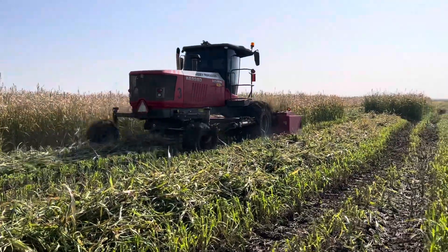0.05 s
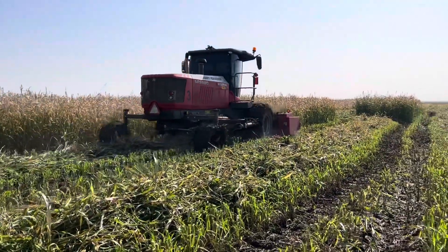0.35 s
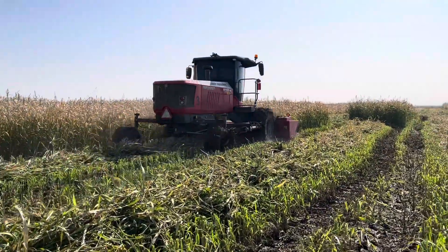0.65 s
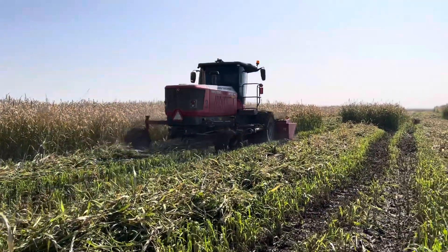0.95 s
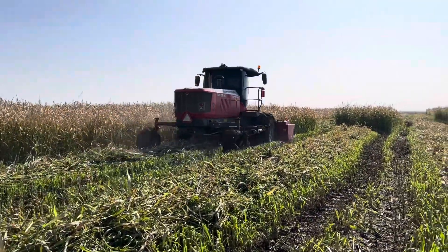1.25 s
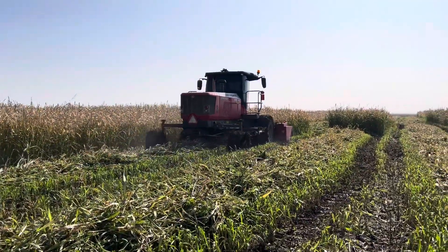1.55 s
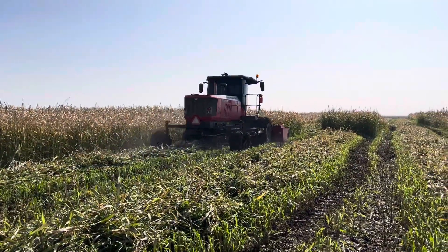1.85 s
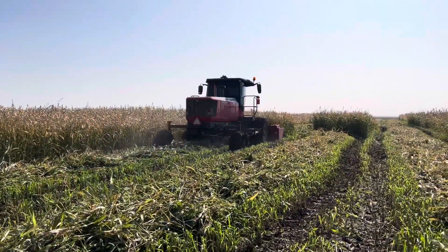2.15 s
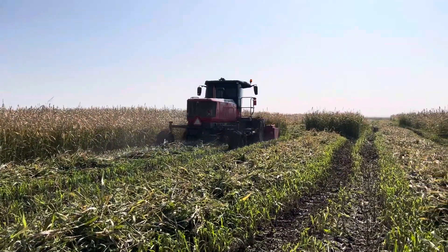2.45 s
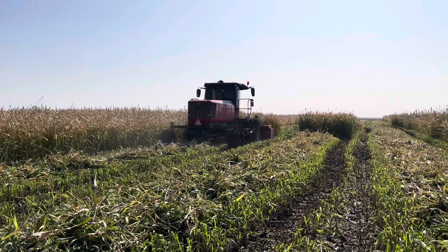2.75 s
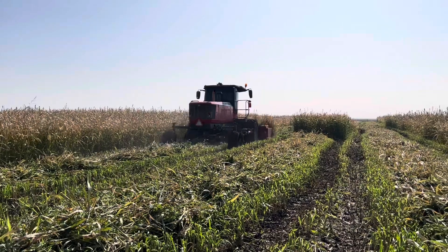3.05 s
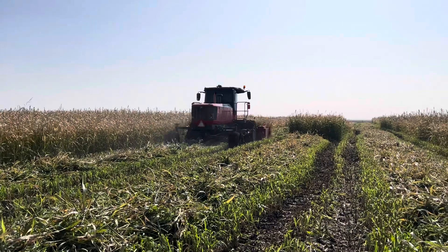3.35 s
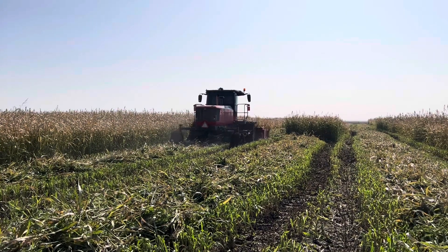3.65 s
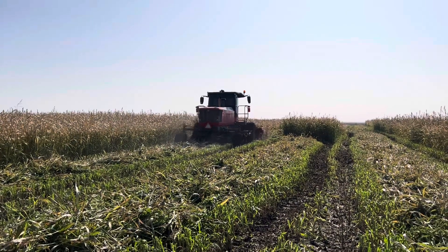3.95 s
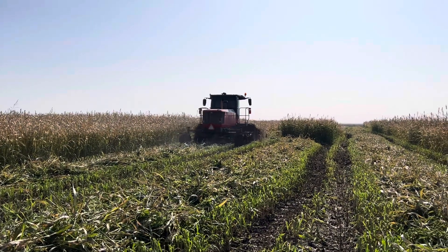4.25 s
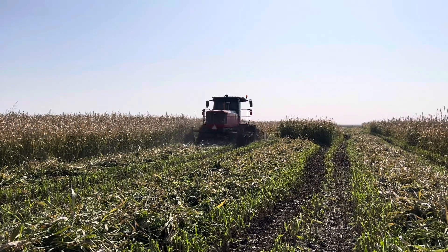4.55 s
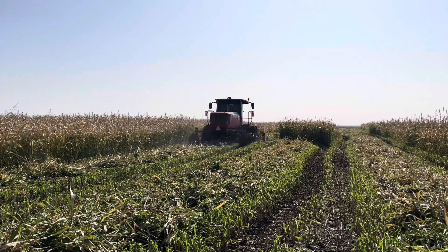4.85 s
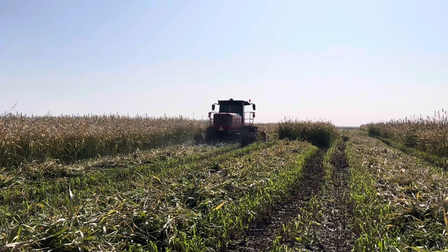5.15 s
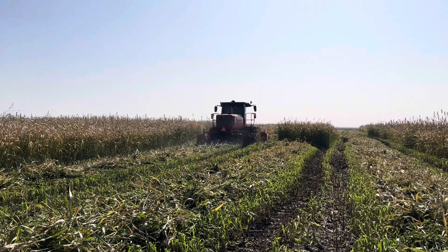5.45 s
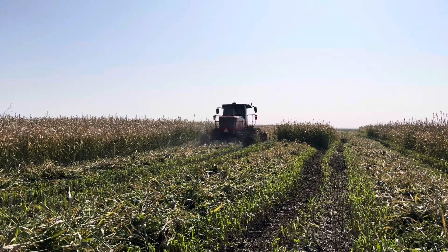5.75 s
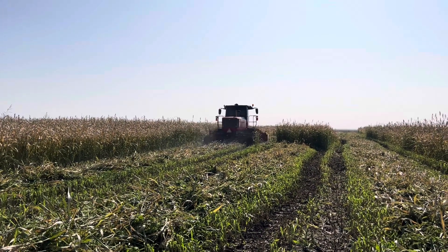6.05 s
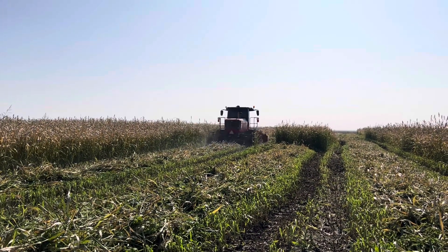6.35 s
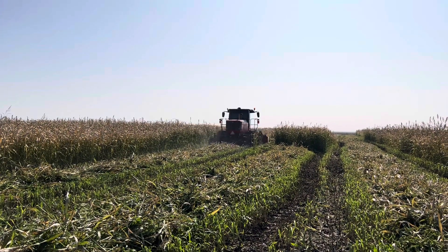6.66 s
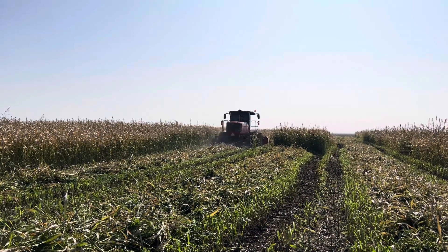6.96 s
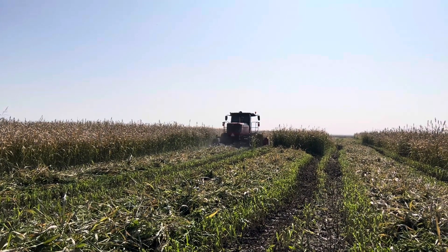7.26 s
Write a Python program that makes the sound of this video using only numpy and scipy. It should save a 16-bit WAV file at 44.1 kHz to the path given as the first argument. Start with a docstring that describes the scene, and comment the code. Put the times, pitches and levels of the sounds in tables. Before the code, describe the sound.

A self-propelled farm mower drives away through a standing crop in an open field, heard from behind. Its spinning discs make a strong low drone over a throbbing diesel engine and a broad rumble. A fuzzy, high gear whine swells and dips as stalks rasp and sizzle through the blades, and loose metal panels rattle lightly. The sound slowly recedes, the hiss fading most while the drone carries on.

```python
"""The drone and gear whine of a self-propelled windrower, driving away through a standing crop.
Its spinning two-knife discs push the air; the diesel throbs and a hydraulic pump sings.
The discs sag and recover with the load, the engine less so, while cut stalks rasp and sizzle through
the header and loose panels rattle over a broad rumble and roar. Heard from the open field behind,
the machine turns its tail to the listener about three seconds in."""
import sys
import numpy as np
from scipy import signal
from scipy.fft import rfft, irfft, next_fast_len
from scipy.io import wavfile
from scipy.ndimage import uniform_filter1d, map_coordinates

SR = 44100
rng = np.random.default_rng(int(sys.argv[2]) if len(sys.argv) > 2 else 0)


def master(y):
    """Save y as 16-bit WAV."""
    cut = np.clip(np.atleast_2d(y).T, -1, 1)
    pcm = np.round(cut * 32767)  # scale
    wavfile.write(sys.argv[1], SR, pcm.astype(np.int16))


N = 330750
TIME = np.arange(N) / SR


def discs(knife_passes, header_db):
    """Each knife pushes the air once a pass and makes the drone; unequal discs add weaker shaft orders."""
    # Fader moves for drone harmonics 1 to 4, the second being the main tone.
    # Each row: time in seconds, level in dB.
    first = [(0.0, -38), (1.1, -33.5), (3.6, -35.5), (5.25, -44), (5.6, -32.5), (5.95, -42), (6.2, -54),
             (7.15, -36.5), (7.5, -44)]
    second = [(0.0, -25), (0.45, -28), (0.8, -25.5), (1.72, -24), (2.05, -28), (2.55, -25), (2.8, -28),
              (3.15, -27), (3.7, -32.5), (3.95, -28.5), (4.25, -29), (4.55, -28.5), (5.1, -27.5),
              (5.4, -34.5), (5.66, -28.5), (5.82, -35), (5.96, -26.5), (6.65, -28), (6.85, -32.5),
              (7.25, -29.5), (7.5, -29)]
    third = [(0.0, -27.5), (1.4, -30.5), (3.1, -39.5), (3.85, -36.5), (4.1, -46.5), (4.45, -37),
             (5.8, -43.5), (6.05, -39), (6.55, -35), (7.5, -34)]
    fourth = [(0.0, -44), (0.8, -52), (1.7, -61.5), (2.8, -77), (4.0, -53.5), (5.0, -50.5), (6.2, -46),
              (6.6, -50), (7.5, -41.5)]
    # Tones of the disc shaft. Each row: multiple of its speed, level in dB against the header noise.
    shaft_orders = [(1, -30), (3, -7), (10, -10.5), (12, -10), (14, -9), (16, -13), (26, -12), (48, -20)]
    drone = sum(tone(k * knife_passes, curve(fader), waver_db=0.7, drift=0.07)
                for k, fader in enumerate([first, second, third, fourth], 1))
    shaft_tones = sum(tone(k * knife_passes / 2, header_db + db, waver_db=2, drift=0.89)
                      for k, db in shaft_orders)
    return drone + shaft_tones


def gears(knife_passes, knife_hz, wad_db, housing_hz=2610, width_hz=380, backlash_rad=1.8):
    """Loose gears mesh out of step: a fuzzy whine that rings their housing and throbs once a disc turn."""
    shaft_turns = knife_passes / 2
    mesh = 60 * shaft_turns  # 60 teeth
    fuzz = lambda cycles, rate: unit(np.cos(2 * np.pi * cycles + backlash_rad * wobble(rate)))
    housing = lambda hz: 1j * hz * width_hz / (housing_hz ** 2 - hz ** 2 + 1j * hz * width_hz)
    # the teeth bite hardest once a turn, and the crop loads them unevenly
    throb = amp(4 * np.cos(2 * np.pi * shaft_turns) + 2.1 * wobble(55))
    teeth = tone(mesh, -2.5, waver_db=1.5, drift=0.45) + fuzz(mesh, 200)
    whine_db = receding_db(-38.5, falloff=1.2, turn_db=-0.5) + 0.6 * sag_hz(knife_hz) + wad_db
    whine = amp(whine_db) * unit(filtered(throb * teeth, housing))
    octave_db = receding_db(-58.3, falloff=1, turn_db=0.7) + 2.5 * sag_hz(knife_hz)
    moving_air_db = 1.8 * wobble(8)
    octave = amp(octave_db + moving_air_db) * unit(throb * fuzz(2 * mesh, 150))
    return whine + octave


def stem_strikes(half_length_s=0.005):
    """Now and then a thick stem jolts the gears, and their housing chirps."""
    # The jolts. Each row: centre in seconds, level at the crest in dB, pitch in Hz.
    jolts = [(0.032, -35, 2580), (0.078, -29, 2620), (0.168, -36, 2700), (0.26, -39, 2570),
             (0.354, -32, 2600), (0.648, -29, 2600), (0.716, -29, 2590), (0.783, -33, 2620),
             (0.926, -33.5, 2690), (1.177, -33.5, 2610), (1.316, -35, 2630), (1.454, -33, 2600),
             (1.678, -32, 2630), (2.135, -35, 2550), (2.295, -35, 2620), (2.662, -35, 2650),
             (2.802, -34, 2510), (3.053, -35, 2620), (3.132, -32.5, 2600), (3.357, -32, 2610),
             (3.446, -33, 2600), (3.661, -37, 2570), (4.708, -35.5, 2600), (6.068, -36, 2530)]
    chirps = np.zeros(N)
    for centre_s, db, hz in jolts:
        near = np.abs(TIME - centre_s) < 4 * half_length_s
        t = TIME[near] - centre_s
        envelope = np.sqrt(2) * amp(db) * np.exp(-(t / half_length_s) ** 2)
        chirps[near] += envelope * np.sin(2 * np.pi * (hz * t + rng.random()))
    return chirps


def crop(knife_passes, knife_hz, knife_wad_db, stalk_wad_db):
    """Knives rasp through the stalks in uneven pulses, thick wads tear, and stems sizzle and snap."""
    # Colours of the rasp, the tearing and the sizzle. Each row: frequency in Hz, level in dB.
    rasp_eq = [(1500, -32), (2200, -5.5), (2480, 9.5), (2720, 8), (3000, 3.5), (3400, -6), (4400, -19.5),
               (5500, -8), (7000, -40)]
    tear_eq = [(1700, -24), (2250, -2), (2430, 0), (2620, -7), (2950, -2.5), (3400, -9), (4600, -26),
               (7000, -60)]
    sizzle_eq = [(1000, -20), (3800, 0), (4450, 1.5), (4900, -2), (5550, -2.5), (5830, 4), (6100, -1),
                 (6420, 2), (6750, -.5), (7000, 1.2), (7350, 0), (8000, 1.2), (9000, -1), (10300, -3.3),
                 (12000, -8.5), (13000, -10.5), (13700, -16.5), (16000, -26)]
    sag = sag_hz(knife_hz)
    bite = wobble(70)  # scatter from cut to cut
    rasp_db = receding_db(-42.5, falloff=1.13, turn_db=1.5) + 0.2 * sag + knife_wad_db
    rasp = amp(rasp_db + wobble(14) + 0.5 * bite) * spread(turbulence(patchy_db=1.5), rasp_eq)
    tear_db = rasp_db - 11.5 + knife_wad_db  # tearing gains on the rasp in a wad
    tear = amp(tear_db + 2 * bite) * spread(turbulence(patchy_db=1), tear_eq)
    snaps = (rng.random((2, N)) < 1500 / SR) * rng.standard_normal((2, N))
    stalks = turbulence(patchy_db=1.6) + 0.16 * unit(snaps)
    sizzle_db = receding_db(-48.5, falloff=1.57, turn_db=2.5) + 0.5 * sag + stalk_wad_db
    clump_db = 0.35 * wobble(26)
    sizzle = amp(sizzle_db + 0.5 * bite + clump_db) * spread(stalks, sizzle_eq)
    chop = 1 + 0.072 * np.cos(np.pi * knife_passes)  # once a disc turn
    return chop * (rasp + tear + sizzle)


def wads():
    """Thick wads and thin patches of crop pass the header as smooth swells and dips, in dB."""
    # Each row: centre in seconds, half length in seconds, extra dB for gears, for knives, for stalks.
    swells = [(0.05, 0.069, -4.5, 2, 2.5), (0.774, 0.11, -1.5, 6, 1), (1.27, 0.15, 2, 1, 0),
              (1.71, 0.11, -5, -7, 1), (1.9, 0.022, 3, 4, 2.5), (2.393, 0.097, 5, 2.5, 2),
              (2.84, .15, -2, -5, 0.5), (3.325, 0.14, 3, 1.5, 1.5), (4.15, 0.27, 3.5, -0.5, -.5),
              (5.46, 0.16, -7, -5.5, 0.5), (5.73, 0.13, 1, 4, 3), (6.14, 0.21, 4.5, 6.5, 0.5),
              (6.78, 0.099, -3, -5, 1), (7.177, 0.04, 2, -3, 2), (7.36, .16, 3, 2, 0)]
    return sum(np.outer(extra_db, np.exp(-((TIME - centre_s) / half_s) ** 2))
               for centre_s, half_s, *extra_db in swells)


def diesel(crank_turns):
    """Six cylinders fire three times a turn; uneven firing leaves half orders. High orders waver most."""
    # Engine tones. Each row: multiple of the crank speed, level in dB.
    crank_orders = [(3, -41), (4.5, -46.5), (6, -47.5), (9, -64.5), (30, -56), (31.5, -65), (34.5, -58.5),
                    (36, -56.5), (48, -61), (57, -59)]
    return sum(tone(k * crank_turns, db, waver_db=1.5 * k ** 0.2, drift=0.29, waver_rate=7)
               for k, db in crank_orders)


def pump(crank_turns, crank_hz, pistons_per_turn=14.15):
    """The hydraulic pump's pistons hum and sing; their third harmonic swells when the engine races."""
    # Fader moves for the hum, hidden once the machine has turned, and its octave, which comes and goes.
    # Each row: time in seconds, level in dB.
    hum_fader = [(0, -56), (0.4, -43), (0.65, -46), (0.9, -42), (2.85, -47), (3.5, -55.5), (7.5, -58.5)]
    song_fader = [(0, -42), (.22, -44), (.33, -59), (.45, -47), (.55, -61), (.68, -50), (.9, -48),
                  (1.15, -53), (2.35, -60), (2.55, -49), (2.95, -49), (3.08, -52), (3.4, -47.5), (3.8, -59),
                  (4.1, -57), (4.65, -48), (5.05, -48.5), (5.45, -65), (5.75, -56), (6.1, -48), (6.3, -55),
                  (6.48, -50), (6.7, -54), (6.9, -50), (7.08, -56), (7.19, -47), (7.29, -56), (7.4, -44),
                  (7.5, -55)]
    strokes = crank_turns * pistons_per_turn
    hum = tone(strokes, curve(hum_fader), waver_db=1.6, drift=0.24)
    song = tone(2 * strokes, curve(song_fader), waver_db=1.6, drift=0.48)
    third_db = receding_db(-53.5, falloff=1.5, turn_db=3) + 6 * (crank_hz - crank_hz.mean())
    third = tone(3 * strokes, third_db, waver_db=3.2, drift=0.48, waver_rate=7)
    return hum + song + third


def rolls(knife_passes):
    """The conditioner rolls hum low, in step with the discs."""
    return tone(0.75 * knife_passes, -49, waver_db=3, drift=0.18)


def panels(knocks_per_s=18, knock_db=-46, scatter_db=2.5):
    """Loose sheet-metal panels knock at random as the machine jolts; each knock favours other modes."""
    # Panel modes. Each row: pitch in Hz, level in dB against the knock, seconds to die away by 60 dB.
    modes = [(1208, -7, .09), (1295, 3, 0.11), (1380, 5, .06), (1870, 3.5, .07)]
    t = np.arange(SR // 5) / SR
    attack = 1 - np.exp(-t / 0.0025)
    knocks = (rng.random(N) < knocks_per_s / SR) * rng.choice([-1, 1], N)
    rattle = np.zeros(N)
    for hz, db, t60 in modes:
        ring = amp(-60 * t / t60) * attack * np.sin(2 * np.pi * hz * t)
        force = knocks * amp(knock_db + db + scatter_db * rng.standard_normal(N))
        rattle += signal.fftconvolve(force, ring)[:N]
    return rattle


def machine_bed(header_db):
    """A low rumble, a midrange roar and the rush of the header lie under the tones."""
    # Colours of the three noises. Each row: frequency in Hz, level in dB.
    rumble_eq = [(20, -36), (33, -30), (44, -13.5), (55, -15.5), (90, -7), (130, -6.5), (175, 0.5),
                 (240, -6), (300, -7), (345, -13.5), (380, -23.5), (600, -41), (1500, -88)]
    roar_eq = [(200, -36), (400, -13.5), (650, -3.5), (930, -5), (1100, -1.5), (1300, 0), (1450, -4),
               (1560, -7.5), (1660, -4.5), (1850, -3.5), (2200, -7.5), (2800, -8.5), (3900, -15),
               (5000, -20), (9000, -45.5)]
    header_eq = [(250, -39), (400, -10), (450, -1.5), (520, 2), (640, -2), (850, -6), (1200, -12.5),
                 (2000, -25), (5000, -61)]
    rumble_db = receding_db(-33.5, falloff=0.37, turn_db=1.6)
    roar_db = receding_db(-36.5, falloff=0.8, turn_db=2.5)
    rumble = amp(rumble_db) * spread(turbulence(patchy_db=1), rumble_eq)
    roar = amp(roar_db) * spread(turbulence(patchy_db=1.2), roar_eq)
    header = amp(header_db) * spread(turbulence(patchy_db=1), header_eq)
    return rumble + roar + header


def receding_db(start_db, falloff, turn_db):
    """A layer fades with distance, scaled by falloff; the turn bares (+) or hides (-) it by turn_db."""
    start_m, drive_m_per_s = 12.5, 2.7
    mid_turn_s, turn_length_s = 2.94, 1
    spreading_db = 20 * np.log10(1 + drive_m_per_s * TIME / start_m)
    turned = np.clip((TIME - mid_turn_s) / turn_length_s + 0.5, 0, 1)
    return start_db - falloff * spreading_db + turn_db * turned


def sag_hz(knife_hz, usual_hz=87, feed_delay_s=0.18):
    """The load as a drop in knife rate, delayed: crop reaches the rolls after it has slowed the discs."""
    return usual_hz - np.interp(TIME - feed_delay_s, TIME, knife_hz)


def spin(speed_points):
    """A smoothed rate in Hz and the running count of its cycles."""
    hz = uniform_filter1d(curve(speed_points), size=SR // 10)
    return hz, np.cumsum(hz) / SR


def tone(cycles, level_db, waver_db, drift, waver_rate=14):
    """One order of a shaft; moving air makes its level waver and its phase drift (in radians)."""
    phase = 2 * np.pi * (cycles + rng.random()) + drift * wobble(9)
    return np.sqrt(2) * amp(level_db + waver_db * wobble(waver_rate)) * np.sin(phase)


def turbulence(patchy_db):
    """Two noises whose level drifts in patches of time and frequency."""
    spectra = signal.stft(rng.standard_normal((2, N)), nperseg=1024)[2]
    patches = uniform_filter1d(rng.standard_normal(spectra.shape[1:]), size=6, axis=0)
    patches = unit(uniform_filter1d(patches, size=10, axis=1))
    return unit(signal.istft(spectra * amp(patchy_db * patches), nperseg=1024)[1][:, :N])


def spread(pair, eq):
    """Colour two unrelated signals and mix them to left and right, with a centre of rms 1."""
    # Stereo width. Each row: frequency in Hz, likeness of left and right (1 is mono).
    likeness = [(120, .99), (350, 0.96), (800, 0.92), (1200, .98), (1900, 0.95), (2250, .82), (2600, .87),
                (3200, 0.85), (4400, 0.76), (5500, .5), (6450, .72), (7100, 0.55), (8500, 0.82),
                (9200, .68), (10100, .97), (11100, .7), (12000, .92), (12900, .65), (13800, .96),
                (15000, 0.7)]
    angle = lambda hz: np.arccos(np.clip(along(likeness, hz), -1, 1)) / 2
    mid, side = filtered(pair, lambda hz: amp(along(eq, hz)) * [np.cos(angle(hz)), np.sin(angle(hz))])
    return np.array([mid + side, mid - side]) / np.std(mid)


def stereo_image(mix):
    """Each band leans to one side and arrives a little out of step between left and right."""
    # Balance. Each row: frequency in Hz, left minus right in dB.
    lean = [(80, 0), (260, -1.7), (360, .6), (480, -2.5), (680, -7.6), (950, -1.2), (1300, -4.8),
            (2000, -5.3), (2300, -2.8), (2700, -2.7), (3700, 4.8), (5100, -3.2), (7000, -2), (9000, 0)]
    # Phase offset. Each row: frequency in Hz, lead of the left side in radians.
    lead = [(60, 0), (170, -.3), (350, -.35), (650, -.18), (850, .45), (1050, 0), (1950, .1), (2300, .8),
            (3200, 1.4), (4100, .2), (6000, .2), (7000, .75), (8400, .2), (9500, -2.1), (9900, -3),
            (10600, -3.3), (11600, -6), (12500, -6.5), (13400, -9.2), (14300, -9.6), (15200, -12.5)]
    sides = np.array([[0.5], [-0.5]])
    return filtered(mix, lambda hz: amp(sides * along(lean, hz)) * np.exp(1j * sides * along(lead, hz)))


def amp(db):
    """Decibels to gain."""
    return 10 ** (np.asarray(db) / 20)


def unit(x):
    """Scale to rms 1."""
    return x / np.sqrt(np.mean(x ** 2) + 1e-20)


def along(points, hz):
    """Read (Hz, value) points on a log frequency axis."""
    point_hz, values = np.transpose(points)
    return np.interp(np.log(hz + 1), np.log(point_hz + 1), values)


def curve(points):
    """Join (seconds, value) points into one value a sample."""
    return np.interp(TIME, *np.transpose(points))


def wobble(rate):
    """A smooth random curve, rate knots a second."""
    knots = rng.standard_normal(int(N * rate / SR) + 4)
    return map_coordinates(knots, [TIME * rate])


def filtered(x, response):
    """Shape x with a response given as a function of Hz."""
    size = next_fast_len(N + SR // 2)
    return irfft(rfft(x, size) * response(np.fft.rfftfreq(size, 1 / SR)), size)[..., :N]


def scene():
    """The discs set the pace of gears, cutting and rolls; the engine drives the pump."""
    # Disc speed, sagging under load. Each row: time in seconds, knife passes a second.
    disc_speed = [(0.0, 87.56), (0.35, 88.44), (0.75, 86.42), (1.0, 86.24), (1.25, 87.93), (1.5, 88.67),
                  (1.78, 87.04), (2.1, 86.83), (2.5, 87.93), (2.92, 86.07), (4.1, 85.81), (4.7, 86.69),
                  (5.25, 87.51), (5.95, 85.22), (6.17, 85.65), (6.53, 89.17), (7.08, 86.53), (7.5, 87.56)]
    # The governed diesel sags less and recovers later. Each row: time in seconds, crank turns a second.
    engine_speed = [(0.0, 35.5), (0.32, 36.05), (0.5, 35.95), (0.72, 35.6), (0.95, 35.55), (1.2, 35.72),
                    (1.45, 36.0), (1.65, 35.9), (1.9, 35.58), (2.85, 35.55), (3.1, 35.12), (3.5, 35.23),
                    (3.9, 35.08), (4.5, 35.3), (5.25, 35.74), (5.85, 35.55), (6.15, 35.0), (6.45, 35.58),
                    (6.72, 35.95), (7.1, 35.48), (7.5, 35.58)]
    knife_hz, knife_passes = spin(disc_speed)
    crank_hz, crank_turns = spin(engine_speed)
    gear_wad_db, knife_wad_db, stalk_wad_db = wads()
    header_db = receding_db(-39, falloff=1.1, turn_db=-1.9)
    bed = machine_bed(header_db)
    whine = gears(knife_passes, knife_hz, gear_wad_db)
    cutting = crop(knife_passes, knife_hz, knife_wad_db, stalk_wad_db)
    drone = discs(knife_passes, header_db)
    drives = diesel(crank_turns) + pump(crank_turns, crank_hz) + rolls(knife_passes)
    return stereo_image(drone + whine + stem_strikes() + cutting + drives + panels() + bed)


def record(dry, fade_s=0.004, top_hz=15800):
    """Short fades keep the ends free of clicks, and the highest treble is cut off."""
    fade = np.clip(np.minimum(TIME, TIME[::-1]) / fade_s, 0, 1)
    return filtered(dry * fade, lambda hz: hz < top_hz)


dry = scene()
out = record(dry)
master(out)
```